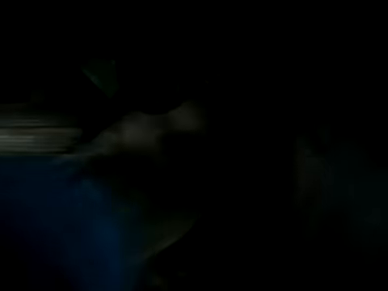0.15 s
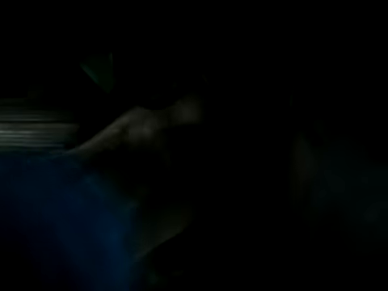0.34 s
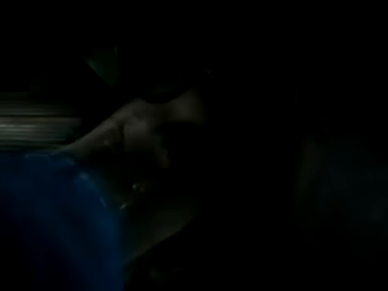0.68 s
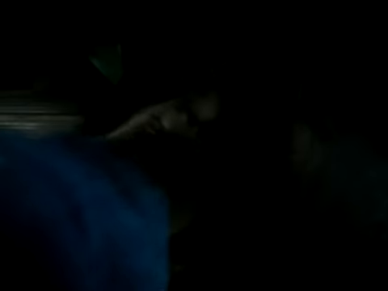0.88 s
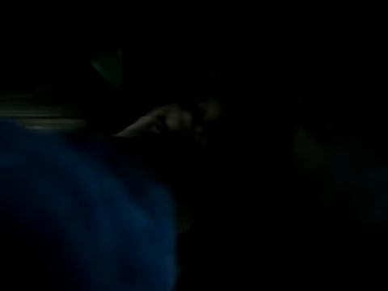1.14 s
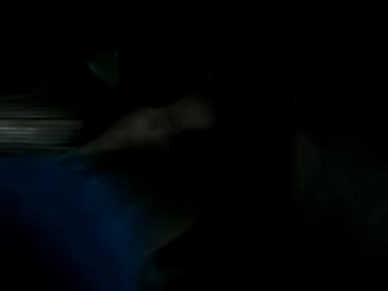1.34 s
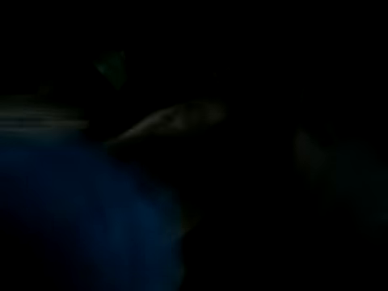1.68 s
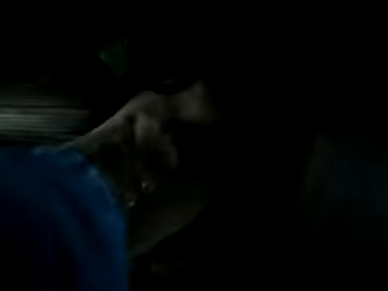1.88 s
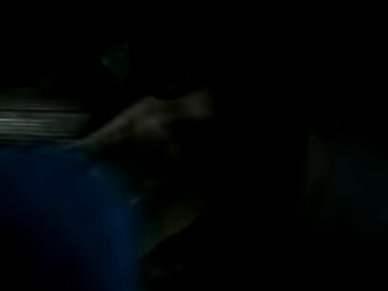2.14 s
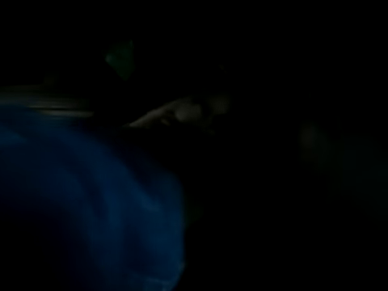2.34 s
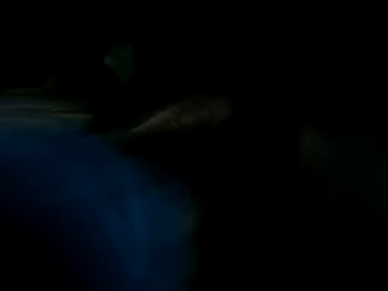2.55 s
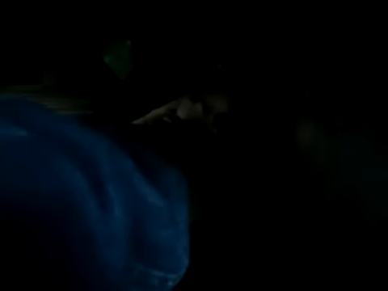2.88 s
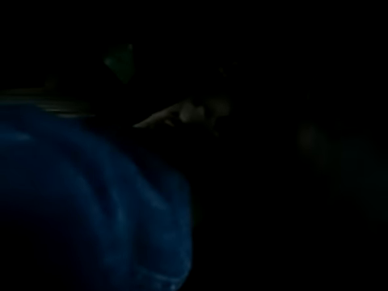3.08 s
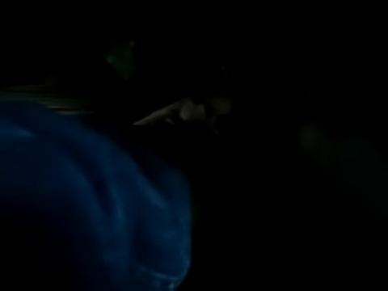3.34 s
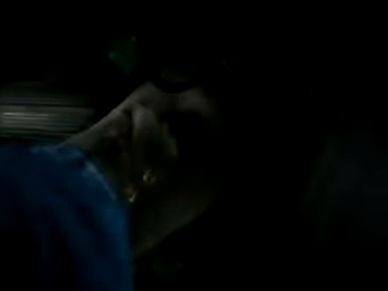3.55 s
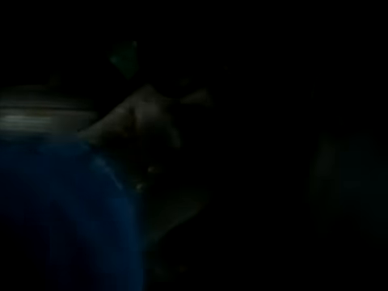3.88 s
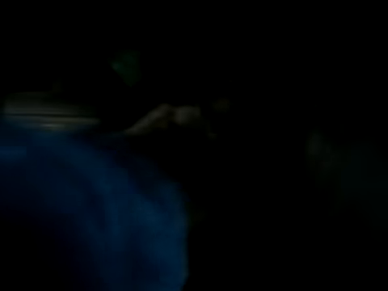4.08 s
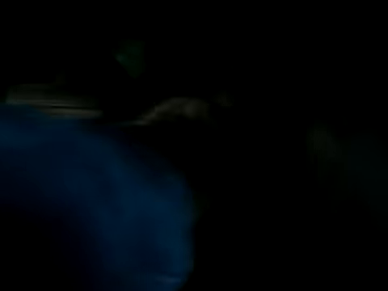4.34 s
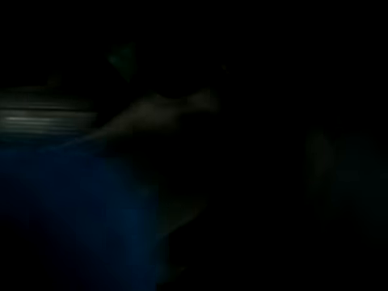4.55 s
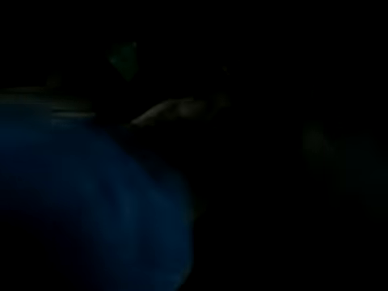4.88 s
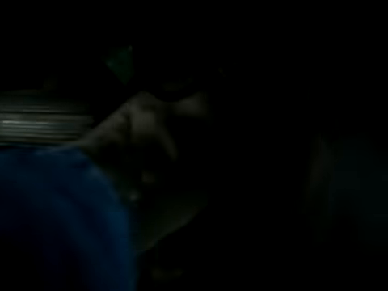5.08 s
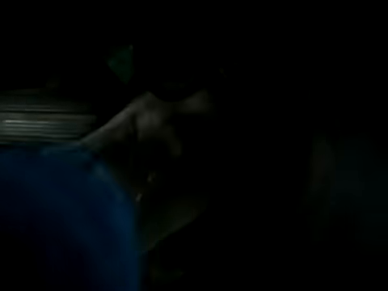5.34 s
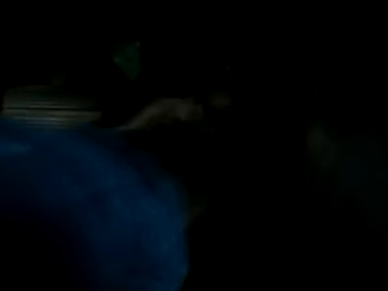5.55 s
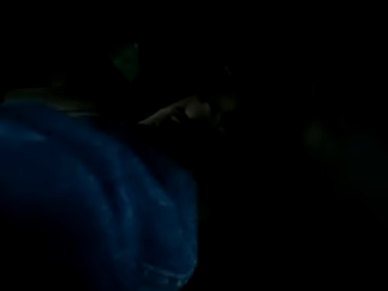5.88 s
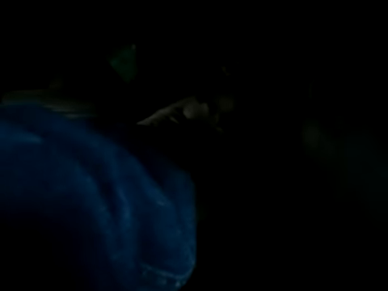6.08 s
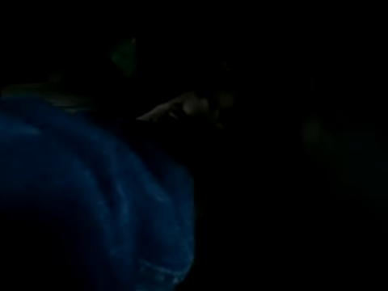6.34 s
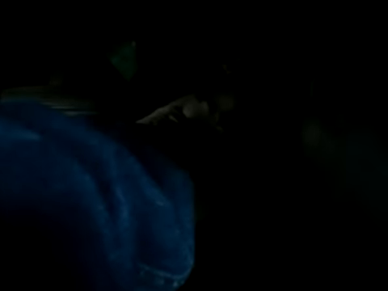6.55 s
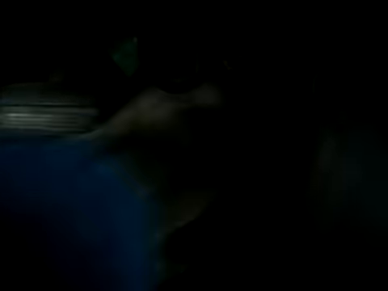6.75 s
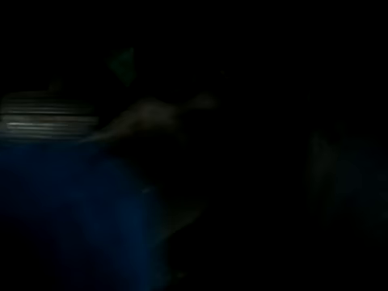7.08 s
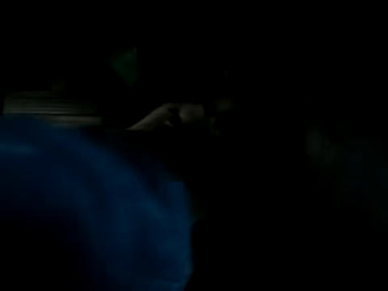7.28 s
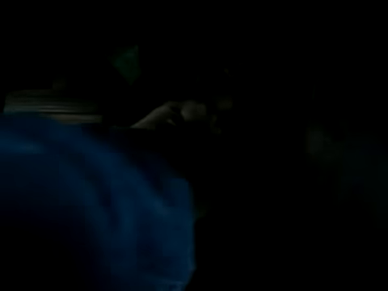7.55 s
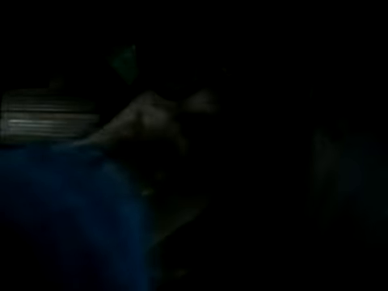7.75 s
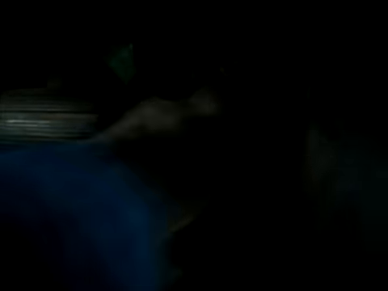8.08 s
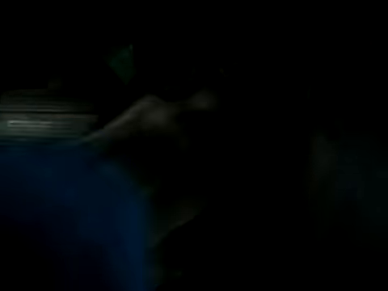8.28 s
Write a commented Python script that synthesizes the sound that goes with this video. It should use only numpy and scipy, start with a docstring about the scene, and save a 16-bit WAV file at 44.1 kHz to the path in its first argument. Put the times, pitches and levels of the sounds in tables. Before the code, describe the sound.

Heard from the seat of an old car, a starter cranks a flooded engine. Uneven thuds with metallic rattles come about three a second, loose clacks and ticks between them. Three times the starter whines and growls, the engine whirls into a rough roar with a low boom, then it drops back to chugging. Close, boxy cabin sound with dulled top.

```python
"""Flooded engine on its starter

A flooded old engine is cranked on its starter, heard from the seat of the car.
It chugs unevenly: noise bursts ring the body shell, and random contacts rattle and clack through metal modes.
Three times it nearly catches: sagging gear tones whine over pinion knocks, filtered noise roars as the engine
whirls, and a low wavering tone booms in the cabin; then it falls back to chugging."""
import sys
import numpy as np
from scipy import signal
from scipy.fft import rfft, irfft, next_fast_len
from scipy.io import wavfile
from scipy.ndimage import uniform_filter1d

SR = 44100
rng = np.random.default_rng(int(sys.argv[2]) if len(sys.argv) > 2 else 0)


def store_wav(level_fs):
    """Save 16-bit WAV to argv[1]."""
    pcm = np.round(np.clip(np.atleast_2d(level_fs), -1, 1) * 32767)
    wavfile.write(sys.argv[1], SR, pcm.T.astype(np.int16))


N = 371763
TIME = np.arange(N) / SR

# compression strokes: (time [s], rattle [dB], thud [dB], length [s], take-up lead [s], take-up level [dB])
STROKE_ROWS = [(0.254, -14.5, -13.5, 0.01, 0.088, -27), (0.564, -21.5, -17, 0.02, 0.067, -42),
               (0.864, -17.5, -12, 0.01, 0.107, -20), (1.151, -14, -8, 0.017, 0.11, -15.5),
               (1.452, -17.5, -12.5, 0.02, 0.14, -27), (1.742, -7.5, -3, 0.0082, 0.11, -18.5),
               (2.037, -13, -8.5, 0.017, 0.11, -21.5), (2.323, -11, -10, 0.013, 0.079, -18.5),
               (2.614, -23.5, -17.5, 0.02, 0.1, -25), (3.771, -20, -15.5, 0.018, 0.18, -21.5),
               (4.074, -16, -11, 0.014, 0.15, -41), (4.366, -18.5, -11.5, 0.019, 0.15, -27.5),
               (4.65, -14, -13, 0.0093, 0.15, -23.5), (4.931, -16.5, -13.5, 0.017, 0.11, -33.5),
               (5.227, -20, -11.5, 0.021, 0.112, -20.5), (5.522, -16, -9.5, 0.028, 0.11, -20.5),
               (5.797, -11, -9, 0.0093, 0.11, -18.5), (6.994, -18, -12, .016, 0.15, -12),
               (7.291, -14, -6.5, 0.013, 0.11, -23), (7.579, -16, -8.5, 0.014, 0.14, -32),
               (7.875, -17, -12, 0.022, 0.097, -19), (8.179, -17, -15.5, 0.0097, 0.14, -25.5)]
# starter spins: (start [s], length [s], starting tooth rate [Hz], whine [dB], overtones [dB], growl [dB])
SPIN_ROWS = [(1.097, 0.062, 976, -11.5, -26, -26), (1.202, 0.11, 1178, -17.5, -27, -26),
             (1.528, 0.099, 1462, -35, -37, -24.5), (1.636, 0.11, 1460, -30.5, -32, -18),
             (1.839, 0.11, 1417, -37, -37, -27.5), (2.056, 0.11, 1420, -39, -38.5, -32),
             (2.15, 0.0762, 1445, -40, -35, -25), (2.24, 0.062, 1412, -33, -33, -20.5),
             (2.677, 0.068, 1392, -42, -44, -35), (2.767, 0.075, 1440, -35, -38.5, -34),
             (2.854, 0.064, 1442, -30, -31, -32), (2.937, 0.074, 1448, -27, -32, -25),
             (3.025, 0.076, 1453, -25, -26, -24), (3.118, 0.08, 1498, -41, -36, -28),
             (3.231, 0.05, 938.5, -28, -23, -30), (3.273, 0.062, 932.5, -18.5, -31, -16),
             (3.342, 0.058, 883, -29, -24, -20), (3.411, 0.074, 902, -33, -36, -20),
             (6.003, 0.039, 929, -19.5, -42, -40), (6.056, 0.11, 1140, -24, -33, -29.5),
             (6.179, 0.096, 1252, -23, -28, -23.5), (6.279, 0.085, 1304, -24, -30, -19.5),
             (6.385, 0.079, 1408, -24.5, -24.5, -20.5), (6.472, 0.063, 1459, -21, -24.5, -17.5),
             (6.569, 0.081, 1466, -23, -22, -18), (6.647, 0.068, 1462, -20, -22.5, -18.5),
             (6.731, 0.079, 1418, -25.5, -28.5, -17.5)]
# resonances of the body shell: (frequency [Hz], width [Hz], level [dB])
SHELL_MODES = [(162, 170, -8.5), (267, 74, 2.5), (330, 76, -5), (522.4, 65.6, 4), (785, 200, -14.5),
               (915, 43, -17), (1200, 140, -14.5)]
# spectrum of loose metal: (frequency [Hz], level [dB per Hz])
RATTLE_SPECTRUM = [(700, -12), (1250, -4), (1800, -9), (2500, -3.5), (3300, -2.5), (3700, -3), (4400, 1.5),
                   (5200, -13), (6400, -24.5), (7100, -47.5)]


def from_db(db):
    """Decibels to gain."""
    return 10 ** (np.asarray(db) / 20)


def rms_one(x):
    """Scale to unit power."""
    return x / np.sqrt(np.mean(x ** 2) + 1e-20)


def level(runs, fade_s, axis=1):
    """Gain from one dB column of several runs, fading in and out beyond their ends."""
    out = np.zeros(N)
    for run in map(np.array, runs):
        inside_s = np.minimum(TIME - run[0, 0], run[-1, 0] - TIME)
        gain = from_db(np.interp(TIME, run[:, 0], run[:, axis]))
        out += gain * np.clip(1 + inside_s / fade_s, 0, 1)
    return out


def drift(knots_per_s):
    """Random wander of rms 1, straight between knots."""
    knots = rng.standard_normal(N // 20)
    return rms_one(np.interp(TIME * knots_per_s, np.arange(len(knots)), knots))


def coloured(x, tone):
    """Shape x by a spectrum, silent outside its table; rms 1."""
    size = next_fast_len(N)
    hz, db = np.transpose(tone)
    freqs = np.maximum(np.fft.rfftfreq(size, 1 / SR), 1)
    gain_db = np.interp(np.log(freqs), np.log(hz), db, left=-np.inf, right=-np.inf)
    return rms_one(irfft(rfft(x, size) * from_db(gain_db), size)[:N])


def resonate(x, hz, width_hz):
    """One two-pole resonance of about unit peak gain."""
    r = np.exp(-np.pi * width_hz / SR)
    feed = np.array([1, 0, -1]) * (1 - r * r) / 2
    return signal.lfilter(feed, [1, -2 * r * np.cos(2 * np.pi * hz / SR), r * r], x)


def ringing(modes):
    """Resonances, each shaken by its own noise; rms 1."""
    total = np.zeros(N)
    for hz, width_hz, db in modes:
        ring = resonate(rng.standard_normal(N), hz, width_hz)
        total += from_db(db) * resonate(ring, hz, hz)   # broad second pass trims the skirts
    return rms_one(total)


def grains(per_s, spread_db):
    """Tiny contacts of uneven size at random moments."""
    sizes = from_db(spread_db * np.minimum(rng.exponential(1, N), 4)) * rng.choice([-1, 1], N)
    return sizes * (rng.random(N) < per_s / SR)


def swell(x, at, length_s, skirt):
    """Burst of x about at = 0, normalised under its window; length_s is the half-power width in at."""
    shape = (1 + (2 ** (.5 / skirt) - 1) * (2 * at / length_s) ** 2) ** -skirt
    return x * shape / np.sqrt(np.sum((x * shape) ** 2) / np.sum(shape ** 2))


def around(s):
    """Samples within 0.08 s of a moment."""
    return slice(max(0, int((s - .08) * SR)), int((s + .08) * SR))


def cabin(x, wet_db, t60_s):
    """Close panels scatter the sound for a moment and break up gliding tones."""
    at = TIME[:SR // 10]
    echoes = rng.standard_normal(len(at)) * from_db(-60 * at / t60_s) * (at > .003)
    wet = from_db(wet_db)
    scattered = signal.fftconvolve(x, echoes / np.linalg.norm(echoes))[:N]
    return (x + wet * scattered) / np.hypot(1, wet)


def jolts():
    """Take-up, lurch and top of each stroke, plus kicks: (time s, rattle dB, thud dB, length s, ring Hz)."""
    # the engine kicks back and knocks on its mounts: (time [s], rattle [dB], thud [dB], length [s])
    kick_rows = [(4.309, -25, -12.5, 0.008), (4.523, -21, -3.5, 0.0027), (4.604, -19, -2, 0.009),
                 (4.879, -28, -12.5, 0.0064), (5.185, -32, -17.5, 0.0073), (6.912, -25, -5.5, 0.0078),
                 (6.933, -9.5, 0, 0.0048), (8.209, -41, -18, 0.015)]
    light_ring_hz, stroke_ring_hz, kick_ring_hz = 3270, 4097, 3130
    rows = []
    for s, db, thud_db, length_s, lead_s, take_up_db in STROKE_ROWS:
        # the drive takes up the load
        rows.append((s - lead_s, take_up_db, take_up_db, 0.016, light_ring_hz))
        # the block leans on its mounts just before the top
        rows.append((s - 0.036, db - 14.5, thud_db - 11.5, 0.011, light_ring_hz))
        rows.append((s, db, thud_db, length_s, stroke_ring_hz))
    return rows + [(*kick, kick_ring_hz) for kick in kick_rows]


def chugs(rattle_db, ring_db, thud_db, thud_stretch):
    """Each compression rocks the shell with a thud and sets loose metal buzzing."""
    out, shell = np.zeros(N), ringing(SHELL_MODES)
    clumping_db = 5.0   # the loose parts bounce in little clusters
    contacts = grains(per_s=1000, spread_db=3) * from_db(clumping_db * drift(knots_per_s=210))
    rattle = coloured(contacts, RATTLE_SPECTRUM)
    for s, db, low_db, length_s, usual_hz in jolts():
        # loose parts seat differently every time
        ring_hz = usual_hz * (1 + rng.uniform(-0.066, 0.06))
        near = around(s)
        at = TIME[near] - s
        ring = rms_one(resonate(resonate(contacts[near], ring_hz, 180), ring_hz, 1200))
        buzz = rattle[near] + from_db(ring_db) * ring
        # rattle and thud both rise faster than they die
        rattle_at = np.where(at < 0, 1.7 * at, at)
        thud_at = np.where(at < 0, 1.61 * at, at)
        out[near] += from_db(db + rattle_db) * swell(buzz, rattle_at, length_s, skirt=1.4)
        thud = swell(shell[near], thud_at, length_s * thud_stretch, skirt=0.81)
        out[near] += from_db(low_db + thud_db) * thud
    return out


def ticks(count):
    """Light contacts at random in the slack before each stroke: (time s, relative dB, centre Hz)."""
    slack_from_s, slack_to_s = 0.23, 0.027
    s = np.repeat(np.array(STROKE_ROWS)[:, 0], count)
    lead_s = slack_to_s + (slack_from_s - slack_to_s) * rng.random(len(s))
    size, pitch = rng.standard_normal((len(s), 2)).T
    tick_db = -20 + 11.5 * np.minimum(size, 1)
    centre_hz = 2620 * 2 ** pitch   # spread of one octave
    return list(zip(np.maximum(s - lead_s, 0), tick_db, centre_hz))


def clacks(gain_db, focus_db, scatter_db, ring_t60_s, tail_db, tail_t60_s, knock_db, knock_t60_s):
    """Each contact rings the metal most near its own centre and knocks on the shell."""
    # metal contacts in the drive, loud and faint: (time [s], relative level [dB], centre [Hz])
    contact_rows = [(0.041, -11.5, 2110), (0.102, -6.5, 1498), (0.1383, 0, 3330), (0.1547, 0, 3200),
                    (0.2483, 5, 4090), (0.2628, -3, 4400), (0.4384, 6, 3140), (0.7116, 4, 1560),
                    (0.805, -9, 3190), (0.823, 3, 3370), (0.852, -2, 3800), (1.025, 1.5, 1800),
                    (1.236, 1.5, 2200), (1.296, 4.5, 3900), (1.3212, -1.5, 3300), (1.339, 0.5, 3240),
                    (1.414, -4, 3460), (1.519, 2, 2170), (1.684, -2, 3500), (1.892, -5, 3600),
                    (1.934, 2, 3185), (2.009, 0, 3500), (2.1354, -5, 2085), (2.1936, 2.5, 1610),
                    (2.2275, 2.5, 3300), (2.434, -4, 4220), (2.486, -4.5, 3400), (2.514, 6, 3400),
                    (2.614, 7.5, 4240), (3.277, -4, 3700), (3.345, 2, 3800), (3.418, 4, 3000),
                    (3.491, 2, 3434), (3.5425, 4.5, 4260), (3.579, -2.5, 3190), (3.708, 8, 3250),
                    (3.837, -1.5, 2480), (3.898, 1, 1580), (3.9392, 1, 3340), (4.034, 2, 3500),
                    (4.129, 2, 2400), (4.197, -2.5, 1800), (4.226, 4.5, 3290), (4.24, -6.5, 3400),
                    (4.306, 0.5, 3150), (4.326, 1, 3400), (4.4843, -1.5, 1170), (4.509, -4, 3300),
                    (4.523, 4, 3280), (4.601, -13, 1500), (4.62, 0.5, 4300), (4.658, -1, 4000),
                    (4.788, -9.5, 4120), (4.81, -7.5, 3300), (4.824, -9, 3370), (4.8763, 1.5, 3100),
                    (4.899, -10, 3300), (5.014, -10.5, 2090), (5.121, -2.5, 2970), (5.192, 1, 3460),
                    (5.3207, -0.5, 4050), (5.4125, 3, 3250), (5.5943, -1.5, 4220), (5.6712, -2, 3400),
                    (5.701, -3, 3220), (6.7368, 2.5, 2680), (6.797, 2, 4120), (6.828, 2, 3600),
                    (6.913, -2, 3120), (7.026, -7.5, 1500), (7.079, -11, 2000), (7.143, -6.5, 3000),
                    (7.223, -3.5, 3300), (7.238, -4, 3300), (7.247, -5, 1500), (7.2538, 2.5, 3260),
                    (7.369, -7.5, 2200), (7.4177, 0, 4100), (7.4628, 4, 3280), (7.567, -0.5, 3600),
                    (7.754, -3, 3800), (7.765, 0.5, 3300), (7.7772, -3, 3300), (7.981, -4.5, 3300),
                    (8.0443, 2, 3230), (8.063, 1.5, 3400), (8.0722, 1.5, 3300), (8.147, 1.5, 1280),
                    (8.22, 1, 4300), (8.269, -6, 2400), (8.362, 10.5, 2800), (8.372, -0.5, 3600)]
    # modes of the loose metal: (frequency [Hz], level [dB])
    metal_modes = [(480, -12.5), (950, 5.5), (1400, 7.5), (1720, 2), (2250, -2), (2680, -0.5), (2970, 0.5),
                   (3350, 7.5), (3800, 0.5), (4300, 3), (4650, -5), (5230, -37.5), (5800, -34.5)]
    out, at, shell = np.zeros(N + SR), TIME[:SR // 12], ringing(SHELL_MODES)
    hz, mode_db = np.transpose(metal_modes)[:, :, None]
    for s, db, centre_hz in [*contact_rows, *ticks(count=4)]:
        octaves_off = np.log2(hz / centre_hz)
        strength_db = mode_db - focus_db * octaves_off ** 2 + scatter_db * rng.standard_normal(hz.shape)
        partials = np.sin(2 * np.pi * hz * at) * rng.choice([-1, 1], hz.shape)
        ring = np.sum(from_db(strength_db - 60 * at / ring_t60_s) * partials, axis=0)
        # brief scatter in the cabin
        echoes = rng.standard_normal(len(at)) * from_db(-60 * at / tail_t60_s)
        tail = signal.fftconvolve(ring, echoes)[:len(at)]
        start = int(s * SR)
        shaken = shell.take(start + np.arange(len(at)), mode="wrap")
        knock = shaken * from_db(-60 * at / knock_t60_s)
        hit = rms_one(ring) + from_db(tail_db) * rms_one(tail) + from_db(knock_db) * rms_one(knock)
        fade_in = 1 - np.exp(-at / 0.0006)   # each clack fades in over about half a millisecond
        out[start:start + len(at)] += from_db(db + gain_db) * hit * fade_in
    return out[:N]


def spin_state():
    """Tooth rate (Hz) of the latest spin: it leaps to its start value and sags steadily."""
    rise_s, release_s, sag_per_s = .014, .014, 1.1   # sag: share of the starting speed lost per second
    s, length_s, hz = np.array(SPIN_ROWS)[:, :3].T
    latest = np.maximum(np.searchsorted(s, TIME) - 1, 0)
    age_s = np.clip(TIME - s[latest], 0, length_s[latest] + release_s)
    return uniform_filter1d(hz[latest] * (1 - sag_per_s * age_s), max(1, int(rise_s * SR)))


def spin_level(axis):
    """Attack, hold and release of every spin, at the level in one dB column."""
    rise_s, release_s = .014, .014
    total = np.zeros(N)
    for row in SPIN_ROWS:
        corners_s = row[0] + np.cumsum([0, rise_s, max(row[1] - rise_s, 0), release_s])
        total += np.interp(TIME, corners_s, np.array([0, 1, 1, 0]) * from_db(row[axis]))
    return total


def starter_gears(phase, whine_db, growl_db, uneven_db):
    """The teeth cry hoarsely, and once a turn the worn pinion knocks on its housing: a growl."""
    # levels of multiples 2, 3, 4 of the tooth rate: (level [dB])
    whine_overtones_db = [0, -8, -23]
    # spectrum of the growl: (frequency [Hz], level [dB per Hz])
    growl_spectrum = [(160, -18.5), (250, 2.5), (350, 3), (530, -9.5), (720, 6), (1050, -4), (1400, -7.5),
                      (1700, -11.5), (2050, -6.5), (2370, -6.5), (2600, -17.5), (2880, 0), (3400, -23),
                      (4000, -15.5), (4500, -8.5), (5200, -18)]
    teeth, hoarseness, flutter_per_s = 8, .75, 230

    def partial(k):
        """One multiple of the tooth rate, roughened by a random complex wobble."""
        wobble = drift(flutter_per_s) + 1j * drift(flutter_per_s)
        return rms_one(np.real((1 + hoarseness * np.sqrt(k) * wobble) * np.exp(1j * k * phase)))

    overtones = rms_one(sum(from_db(db) * partial(k) for k, db in enumerate(whine_overtones_db, 2)))
    cry = partial(0.98) * spin_level(axis=3) + overtones * spin_level(axis=4)
    turns = phase // (2 * np.pi * teeth)
    knocks = np.diff(turns, prepend=0) * from_db(uneven_db * rng.standard_normal(N))
    growl = coloured(cabin(knocks, wet_db=10.5, t60_s=0.045), growl_spectrum)
    return from_db(whine_db) * cry + from_db(growl_db) * growl * spin_level(axis=5)


def surge(rise_s, sag_s):
    """The engine sinks before each spin's start, leaps up and settles again; about -1 to 1."""
    swing = sum(np.sign(TIME - s) * np.exp(-abs(TIME - s) / sag_s) for s, *_ in SPIN_ROWS)
    return uniform_filter1d(swing, max(1, int(rise_s * SR)))


def whirl(body_db, body_ring_db, crackle_db, crackle_surge_db):
    """At speed the block roars and rings, and the gears crackle, most as each surge slams them together."""
    # the engine whirling faster, one table a run: (time [s], body [dB], gear crackle [dB])
    whirl_runs = [
        [(1.06, -15, -27), (1.13, -28, -20), (1.19, -25, -26), (1.31, -32, -26)],
        [(2.76, -40, -37.5), (3.11, -20, -21.5), (3.28, -17.5, -15), (3.43, -14, -16.5), (3.56, -26.5, -26)],
        [(5.94, -33, -38), (6.1, -37.5, -33), (6.5, -21.5, -18), (6.65, -20, -19.5), (6.82, -23.5, -22.5)],
    ]
    # resonances of the whirling engine: (frequency [Hz], width [Hz], level [dB])
    engine_modes = [(354, 120, -6.5), (527, 99, -3.5), (780, 19, -14), (896, 79, -4)]
    # spectra of roar and crackle: (frequency [Hz], level [dB per Hz])
    roar_spectrum = [(80, 2.5), (150, -24.5), (220, -1), (380, 7.5), (560, 6), (900, 1.5), (1150, -15.5),
                     (1420, -1), (1800, -10), (2400, -47)]
    crackle_spectrum = [(1400, -38.5), (1800, -1.5), (2350, 8), (2900, 3), (3400, -1), (4400, 7),
                        (5200, -8), (6500, -17.5), (7100, -68.5)]
    roar = coloured(rng.standard_normal(N), roar_spectrum)
    body = from_db(body_db) * roar + from_db(body_ring_db) * ringing(engine_modes)
    contacts = coloured(grains(per_s=2500, spread_db=4), crackle_spectrum)
    crackle = from_db(crackle_db + crackle_surge_db * surge(rise_s=0.004, sag_s=0.03)) * contacts
    return body * level(whirl_runs, fade_s=0.026) + crackle * level(whirl_runs, fade_s=0.017, axis=2)


def hum(phase, gain_db, rough_db):
    """The motor's rough hum, geared to the teeth so that it glides with them."""
    # hum under load, one table a run: (time [s], level [dB])
    hum_runs = [
        [(1.48, -31), (1.7, -37), (2.25, -36.5)],
        [(2.8, -38.5), (3.08, -26.5)],
        [(6.2, -33.5), (6.5, -21), (6.66, -19.5), (6.82, -27.5)],
    ]
    # levels of hum multiples 1, 2, 3: (level [dB])
    hum_partials_db = [3, 0, -8.5]
    hum_phase = phase / 4   # four teeth a hum cycle
    tone = rms_one(sum(from_db(db) * np.sin(k * hum_phase) for k, db in enumerate(hum_partials_db, 1)))
    return tone * level(hum_runs, fade_s=0.02) * from_db(gain_db + rough_db * drift(knots_per_s=120))


def at_strokes(shift_s, width_s):
    """A smooth hump of height 1 beside every stroke."""
    return sum(np.exp(-np.minimum(((TIME - s - shift_s) / width_s) ** 2, 20)) for s, *_ in STROKE_ROWS)


def churn(body_db, chatter_db, flutter_db):
    """The turning crank and valve gear: a low murmur and fine metallic chatter, both following the load."""
    # churn under the strokes: (time [s], level [dB])
    churn_levels = [(0, -40.5), (.4, -45), (.9, -28), (1.7, -29.5), (1.85, -31.5), (2.25, -27.5),
                    (2.42, -32.5), (2.75, -36.5), (3.6, -36), (4.1, -27), (4.8, -38.5), (5.6, -27),
                    (5.92, -39.5), (6.9, -29), (8.43, -34.5)]
    # spectrum of the murmur: (frequency [Hz], level [dB per Hz])
    churn_spectrum = [(20, -7.5), (45, -5.5), (72, -8), (110, -7.5), (190, -9.5), (270, -0.5), (540, -5.5),
                      (900, -9), (1400, -28.5), (2200, -17)]
    floor_db = -54   # the murmur never stops
    # it grows as a cylinder compresses and falls as the crank coasts past the top
    load_db = 7 * at_strokes(shift_s=-0.0043, width_s=0.013) - 0.5 * at_strokes(shift_s=0.1, width_s=.035)
    gain = from_db(np.interp(TIME, *np.transpose(churn_levels)) + load_db) + from_db(floor_db)
    gain = gain * from_db(flutter_db * drift(knots_per_s=75))
    body = coloured(rng.standard_normal(N), churn_spectrum)
    chatter = coloured(grains(per_s=900, spread_db=3), RATTLE_SPECTRUM)
    return gain * (from_db(body_db) * body + from_db(chatter_db) * chatter)


def chirps(length_s, width_hz):
    """Short rough squeaks of a slipping belt: noise through a narrow resonance."""
    # chirps as a stroke loads the engine: (time [s], level [dB], pitch [Hz])
    chirp_rows = [(7.275, -28, 1328), (7.564, -21, 1267), (7.861, -13.5, 1269), (8.165, -35, 1260)]
    out = np.zeros(N)
    for s, db, hz in chirp_rows:
        near = around(s)
        squeak = resonate(resonate(rng.standard_normal(N)[near], hz, width_hz), hz, width_hz)
        out[near] += from_db(db) * swell(squeak, TIME[near] - s, length_s, skirt=7.5)
    return out


def boom_level():
    """Each spell sets in quickly, grows a little while it lasts and dies away to a steady floor."""
    # spells of exhaust booming in the cabin: (start [s], length [s], mid-spell level [dB])
    boom_rows = [(1.062, 0.05, -15), (1.655, 0.059, -27), (1.966, 0.024, -34.5), (2.824, 0.36, -23.5),
                 (3.284, 0.15, -10), (3.854, 0.58, -34.5), (5.954, 0.12, -32), (6.361, 0.37, -24)]
    attack_s, growth_db_per_s, release_db_per_s, floor_db = 0.01, 19, 130.5, -49.5
    out = from_db(floor_db)
    for s, length_s, db in boom_rows:
        at = TIME - s
        growth_db = growth_db_per_s * (np.clip(at, 0, length_s) - length_s / 2)
        release_db = release_db_per_s * np.maximum(at - length_s, 0)
        out = out + from_db(db + growth_db - release_db) * np.clip(1 + at / attack_s, 0, 1)
    return out


def boom(hz, waver, tone_db, rumble_db):
    """The cabin's lowest air mode swings unsteadily over a broad rumble."""
    # spectrum of the rumble: (frequency [Hz], level [dB per Hz])
    rumble_spectrum = [(15, -24), (26, -10.5), (45, -15), (135, -13.5), (200, -16), (400, -27)]
    phase = 2 * np.pi * np.cumsum(hz * (1 + waver * drift(knots_per_s=24))) / SR
    tone = np.sqrt(2) * np.sin(phase) * from_db(2.4 * drift(knots_per_s=25))
    rumble = coloured(rng.standard_normal(N), rumble_spectrum)
    return boom_level() * (from_db(tone_db) * tone + from_db(rumble_db) * rumble)


def scene():
    """All the parts of the engine and starter, heard at one point in the cabin."""
    strokes = chugs(rattle_db=3.0, ring_db=-4.0, thud_db=0.3, thud_stretch=0.84)
    contacts = clacks(gain_db=-24.5, focus_db=5.0, scatter_db=3.5, ring_t60_s=0.0056,
                      tail_db=-6.5, tail_t60_s=0.025, knock_db=-11.0, knock_t60_s=0.062)
    shaft_jitter = .011   # rms share of speed
    tooth_hz = spin_state() * (1 + shaft_jitter * drift(knots_per_s=270))
    tooth_phase = 2 * np.pi * np.cumsum(tooth_hz) / SR
    gears = starter_gears(tooth_phase, whine_db=-1.0, growl_db=-2.0, uneven_db=5.5)
    gears = cabin(gears, wet_db=-4.5, t60_s=0.032)
    racing = whirl(body_db=-2.0, body_ring_db=-1.5, crackle_db=-5.0, crackle_surge_db=3.5)
    turning = churn(body_db=0.5, chatter_db=-5.5, flutter_db=3.5)
    running = cabin(turning + racing, wet_db=-1.5, t60_s=0.077)
    running = running + hum(tooth_phase, gain_db=2.5, rough_db=3.5)
    surge_db, unevenness_db = 1.5, 2.5   # backlash in the gears makes the running stutter
    swing_db = surge_db * surge(rise_s=0.0072, sag_s=0.029)
    running = running * from_db(swing_db + unevenness_db * drift(knots_per_s=85))
    belt = chirps(length_s=0.017, width_hz=51)
    rumble = boom(hz=70.9, waver=0.014, tone_db=0.5, rumble_db=-3.0)
    return (strokes + contacts + gears + running + belt + rumble)[None]


def record(dry):
    """The loudest peaks are rounded and the top is cut."""
    top, cutoff_hz = .88, 6850
    low_pass = signal.ellip(8, .5, 60, cutoff_hz, fs=SR, output="sos")
    return signal.sosfilt(low_pass, top * np.tanh(dry / top))


dry = scene()
out = record(dry)
store_wav(out)
```